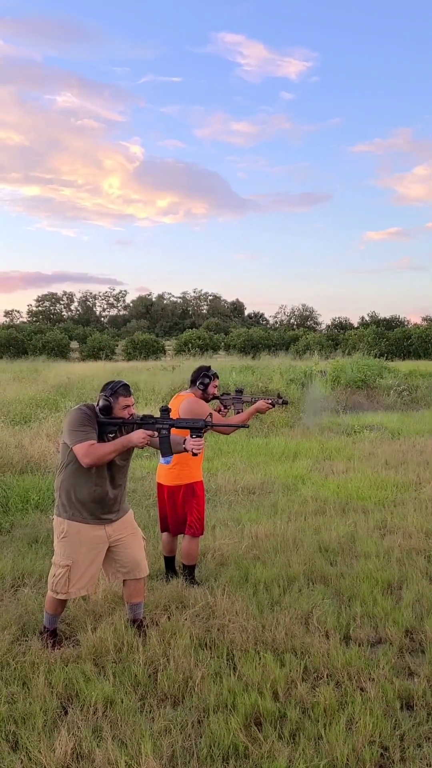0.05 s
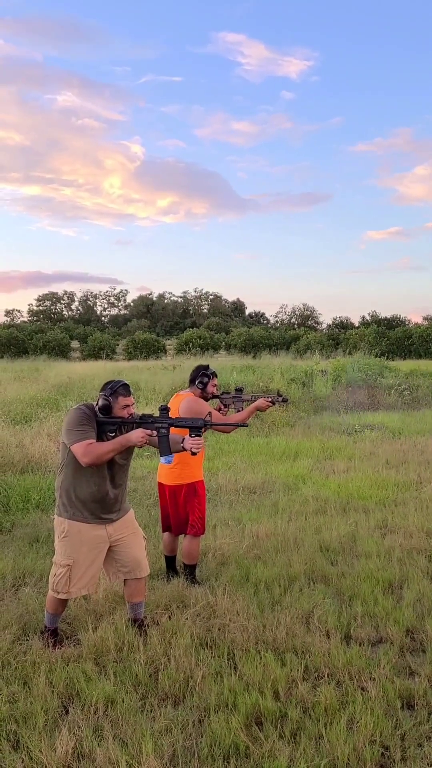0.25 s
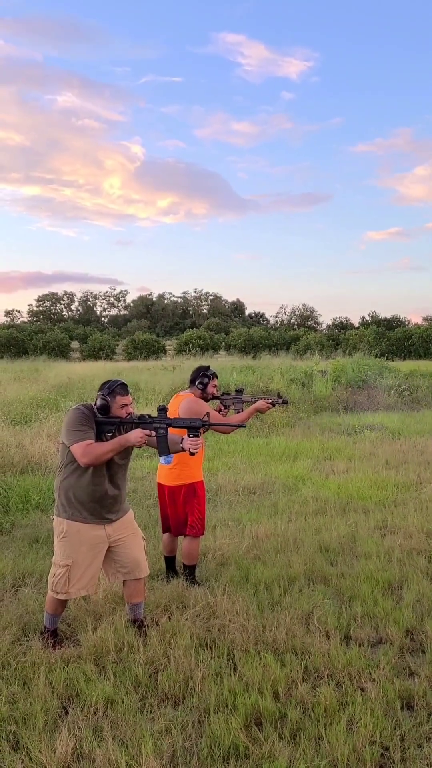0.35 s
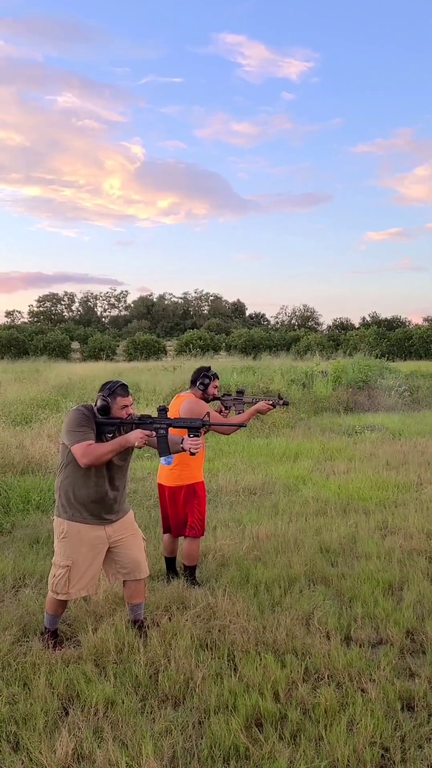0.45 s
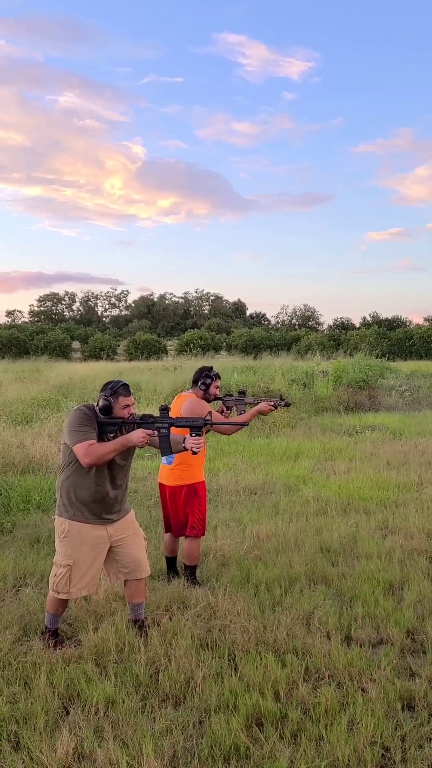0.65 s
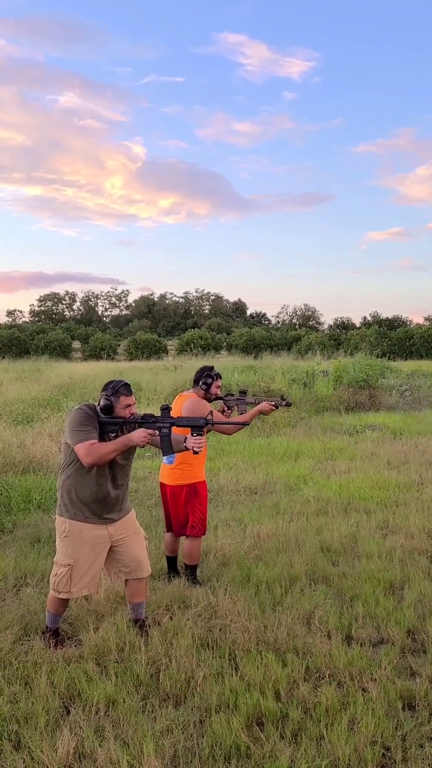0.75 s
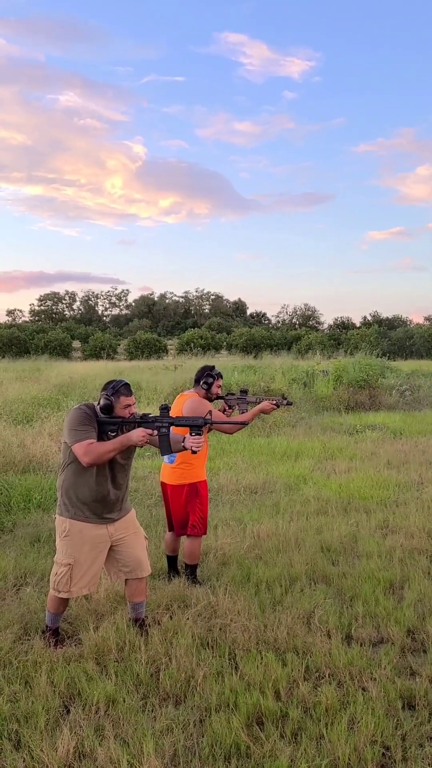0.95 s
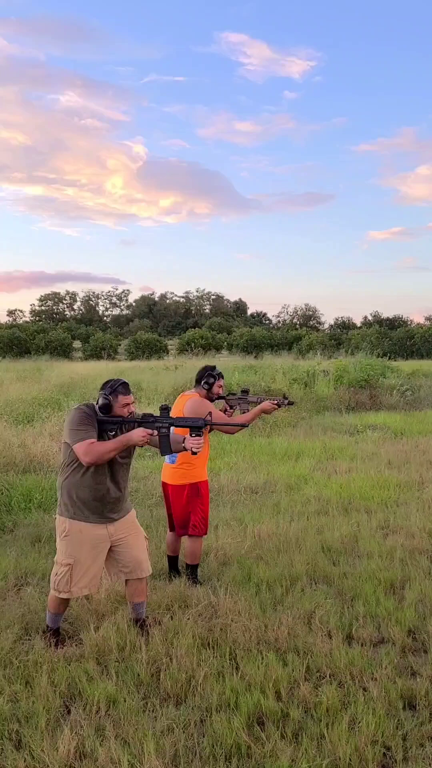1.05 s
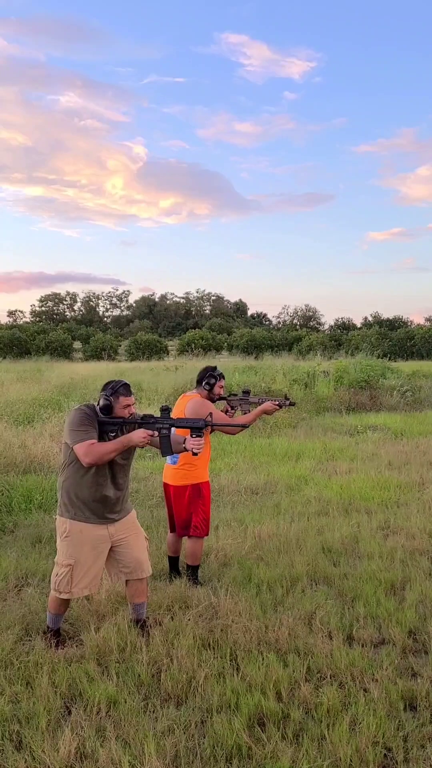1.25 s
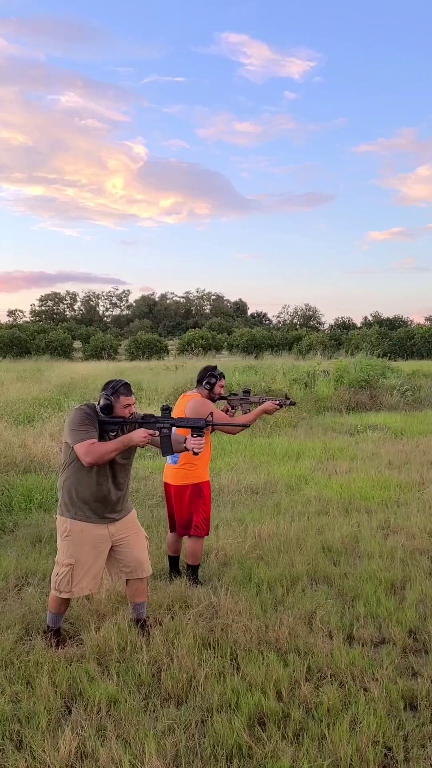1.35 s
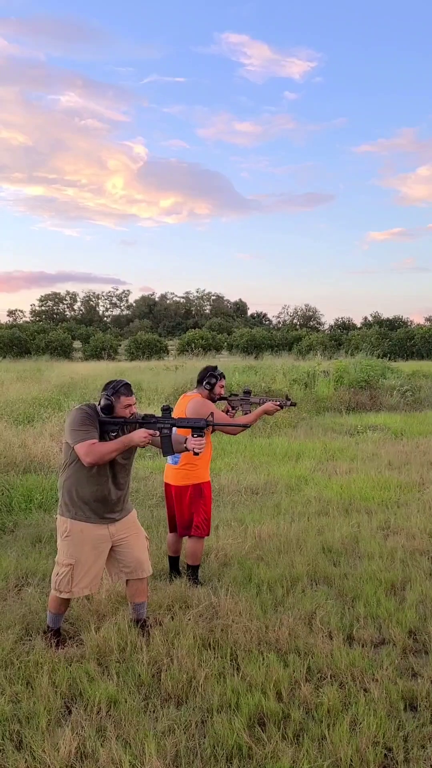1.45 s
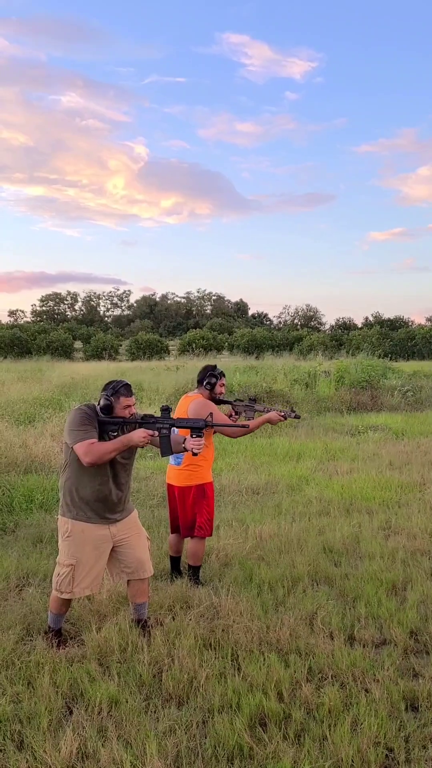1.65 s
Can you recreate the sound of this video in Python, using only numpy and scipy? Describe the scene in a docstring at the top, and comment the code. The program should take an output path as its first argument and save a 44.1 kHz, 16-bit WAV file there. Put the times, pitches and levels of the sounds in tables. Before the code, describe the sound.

Two loud shotgun blasts go off nearby at about 0.2 and 0.35 seconds, over the faint fading echo of an earlier shot. Each has a metal reloading clack and echoes across an open field. Small gun clicks come at 0.6 seconds, and light wind bumps the microphone around 0.9. A third blast hits at 1.1 seconds, followed by more clicks until 1.5 and a very faint, distant whistle near 1.7.

```python
"""In an open grassy field, an earlier shot is dying away in a light wind. After a thin tick, two shooters
a few metres off fire two quick shotgun blasts, each a pressure pulse, a boom, a thump and rushing gas.
After each, the field scatters the sound back, the self-loading gun clacks and a tree line answers.
Gun parts click, the wind swells and bumps the microphone, and a third blast goes off.
More clicks follow, and last comes a faint, far whistle."""
import sys
import numpy as np
from scipy import signal
from scipy.fft import rfft, irfft
from scipy.io import wavfile
from scipy.ndimage import uniform_filter1d

SR = 44100
rng = np.random.default_rng(int(sys.argv[2]) if len(sys.argv) > 2 else 0)


def put_to_file(sound):
    """Save the sound as 16-bit audio at rate SR, in the file named by the first command-line argument."""
    columns = np.atleast_2d(sound).T  # one column per channel
    safe = np.clip(columns, -1, 1)
    whole_steps = np.round(safe * 32767)
    wavfile.write(sys.argv[1], SR, whole_steps.astype(np.int16))


N = 74970
T, HZ = np.arange(N) / SR, np.fft.rfftfreq(N, 1 / SR)

def amp(db):
    """Turns decibels into a number to multiply by."""
    return 10 ** (np.asarray(db) / 20)

def unit(x):
    """Scales a signal to an average strength (rms) of 1."""
    return x / np.sqrt(np.mean(x ** 2) + 1e-20)

def read(points, hz):
    """Looks up a table at any pitch, sliding between its rows."""
    pitch, value = np.transpose(points)
    return np.interp(np.log(hz + 1), np.log(pitch + 1), value)

def after(s):
    """Time since s, zero before it."""
    return np.maximum(T - s, 0)

def fade(s, fade_s):
    """A level that jumps up at time s and dies away."""
    return (T >= s) * np.exp(-after(s) / fade_s)

def ring(s, hz, fade_s):
    """A tone that starts at time s and dies away."""
    return np.sin(2 * np.pi * hz * after(s)) * fade(s, fade_s)

def swell(s, width_s):
    """A smooth rise and fall around time s."""
    return np.exp(-.5 * ((T - s) / width_s) ** 2)

def flutter(span_s):
    """A random wobble that changes over span_s."""
    return unit(uniform_filter1d(rng.standard_normal(N), max(int(span_s * SR), 1)))

def panned(x, pan_db):
    """Makes the left side pan_db louder than the right."""
    return x * amp(pan_db * np.array([[.5], [-.5]]))

# Where the field's sound sits: (pitch [Hz], left minus right [dB])
FIELD_BALANCE = [(100, -1), (300, 0), (2400, -1), (6000, -1.5), (14000, -1.5)]
# How alike its two sides are: (pitch [Hz], likeness [0 to 1])
FIELD_LIKENESS = [(300, 0.92), (700, 0.84), (1400, 0.44), (3000, 0.031)]
def noise(tone, balance=FIELD_BALANCE, likeness=FIELD_LIKENESS):
    """Stereo noise of strength 1; tone says how strong its pitches are next to each other."""
    left, other = rfft(rng.standard_normal((2, N)))
    alike = np.clip(read(likeness, HZ), -1, 1)
    right = alike * left + np.sqrt(1 - alike ** 2) * other
    level_db = read(tone, HZ) + np.outer([.5, -.5], read(balance, HZ))
    return unit(irfft(np.array([left, right]) * amp(level_db), N))

def scatter(s, tone, fade_times, peak_s, rise_db):
    """Sound thrown back by plants builds for peak_s, then each pitch dies at its own speed."""
    hz, t, spectrum = signal.stft(noise(tone), SR, nperseg=256)
    spectrum *= amp(-60 * np.maximum(t - s - peak_s, 0) / read(fade_times, hz)[:, None])
    tail = signal.istft(spectrum, SR, nperseg=256)[1][:, :N]
    uneven_db = 1.22 * flutter(span_s=.0059)
    build_db = -rise_db * np.maximum(1 - after(s) / peak_s, 0) ** 2
    return tail * (T > s) * amp(uneven_db + build_db)

# What is left of an earlier shot: (pitch [Hz], level [dB])
EARLIER_TONE = [(60, -20.5), (185, -3.5), (260, -19), (428, -2), (798, -7.5), (1750, -7.5), (2360, -14.5),
                (4510, -13), (14000, -28)]
# How long far echoes last: (pitch [Hz], time to fall 60 dB [s])
FAR_FADES = [(200, 3.14), (1000, 1.26), (5000, 1.33), (12000, 0.6)]
FAR_PEAK_S, FAR_RISE_DB = .18, 26
def earlier_shot():
    """The far echo of an earlier shot is already dying away."""
    return amp(-40) * scatter(-FAR_PEAK_S, EARLIER_TONE, FAR_FADES, FAR_PEAK_S, FAR_RISE_DB)

# The hush of open air: (pitch [Hz], level [dB])
AIR_TONE = [(30, -20.5), (90, -1), (300, -13), (650, -16.5), (1400, -5.5), (2300, -17), (7500, -21),
            (9500, -61), (15000, -57)]
# Where it sits: (pitch [Hz], left minus right [dB])
AIR_BALANCE = [(1300, -1), (4400, -4.5), (8000, 4)]
def open_air():
    """A quiet, steady hush lies under everything."""
    return amp(-51) * noise(AIR_TONE, AIR_BALANCE)

# The wind's rumble: (pitch [Hz], level [dB])
WIND_TONE = [(20, -17), (50, -2.5), (90, -5), (200, -22.5), (700, -70)]
# Its rise and fall: (time [s], level [dB])
WIND_STRENGTH = [(0, -63), (.7, -67), (.75, -51.5), (1.05, -43.5), (1.25, -59.5), (1.42, -53), (1.7, -51.5)]
def wind():
    """Light wind rumbles unevenly as it brushes the microphone."""
    level_db = np.interp(T, *np.transpose(WIND_STRENGTH)) + 2.5 * flutter(span_s=.03)
    return amp(level_db) * noise(WIND_TONE, balance=[(100, 1.5)], likeness=[(100, .34)])

# The trigger's tick: (pitch [Hz], level [dB])
TRIGGER_TONE = [(5000, -20), (9000, -3), (12500, 15), (15000, -21)]
def trigger():
    """A thin tick comes just before the first blast."""
    return amp(-41.5) * fade(.166, fade_s=.0033) * noise(TRIGGER_TONE)

# The shots; each dB column turns one part up or down:
# (time [s], gas [dB], pulse [dB], boom [dB], boom pitch [Hz], boom fade [s], body [dB], thump [dB],
#  lead-in [dB], bolt [dB], field echo [dB], field echo peak after [s], brush [dB], trees [dB])
GUNSHOTS = [(0.2300, 1.5, 3, -6.5, 478, 0.0068, -16, 1.5, 9, -10, -0.5, 0.068, 0.5, -20),
            (0.3576, 2.5, -4, -5.5, 650, 0.0046, -14.5, -2.5, -33.5, -7, 0, 0.025, -8.5, 2),
            (1.0814, 2, -7, -7.5, 658, 0.004, -19, -5.5, 8, -3.5, 1, 0.044, -6.5, 3.5)]
def shotguns():
    """Each shot makes a blast, works the gun's bolt and sets off three echoes."""
    sound = np.zeros((2, N))
    for s, *blast_settings, bolt_db, field_db, peak_s, brush_db, trees_db in GUNSHOTS:
        sound += blast(s, *blast_settings) + bolt(s, bolt_db)
        sound += field_echo(s, field_db, peak_s) + brush_echo(s, brush_db) + tree_echo(s, trees_db)
    return sound

def pulse(s):
    """A sudden push of air, followed by suction."""
    age = after(s) / .00035
    return (T >= s) * (1 - age) * np.exp(-age)

# The brief hiss leading into a blast: (pitch [Hz], level [dB])
LEAD_TONE = [(100, -14), (300, -4), (680, 1), (1100, -5), (2300, -9.5), (3600, -7.5), (9000, -15.5),
             (14000, -14.5)]
# The harsh rush of gas: (pitch [Hz], level [dB])
GAS_TONE = [(60, -32.5), (150, -13), (300, -15), (620, -2.5), (1000, -0.5), (1450, -4.5), (2050, -19.5),
            (2550, -21), (3000, -8), (4200, -7), (6200, -13.5), (8200, -15.5), (9200, -22.5), (12500, -8),
            (14500, -18.5)]
# Where it sits: (pitch [Hz], left minus right [dB])
GAS_BALANCE = [(200, 17), (700, 1), (1300, 6), (2400, -2.5), (4400, -9.5), (8100, 1), (15000, -12.5)]
# How alike its two sides are: (pitch [Hz], likeness [0 to 1])
GAS_LIKENESS = [(300, 0.47), (700, 0.19), (1400, 0.0052)]
def blast(s, gas_db, pulse_db, boom_db, boom_hz, boom_fade_s, body_db, thump_db, lead_db):
    """After a brief lead-in come a pulse, a boom, a lower body tone, a thump and rushing gas."""
    paths = [(s, 1), (s + .0031, amp(-8))]  # straight here, and bounced off the ground
    lag_s = .00029 * np.array([[.5], [-.5]])  # the boom reaches the left side later
    shock = amp(pulse_db - 6) * sum(gain * pulse(at) for at, gain in paths)
    boom = amp(boom_db) * sum(gain * ring(at + lag_s, boom_hz, boom_fade_s) for at, gain in paths)
    body = amp(body_db) * sum(gain * ring(at, hz=298, fade_s=.0042) for at, gain in paths)
    thump = -amp(thump_db - 18) * ring(s - .003, hz=64, fade_s=.0096)
    gas_shape = (T >= s) * np.exp(-after(s + .0059) / .0044)  # holds briefly, then fades
    gas = amp(gas_db - 12.5) * gas_shape * noise(GAS_TONE, GAS_BALANCE, GAS_LIKENESS)
    lead_shape = (T < s) / (1 + ((T - s + .0042) / .0018) ** 2)  # peaks just before the pulse
    lead_sound = amp(-2.5) * noise(LEAD_TONE) + amp(-3.5) * np.sin(2 * np.pi * boom_hz * (T - s))
    lead_in = amp(lead_db - 22) * lead_shape * lead_sound
    return lead_in + panned(shock + body + thump, pan_db=4) + boom + gas

# The echo from the grass: (pitch [Hz], level [dB])
FIELD_TONE = [(60, -30), (282, -7.5), (500, 0), (700, -0.5), (1400, -4), (2300, -14), (3120, -6),
              (5950, -5), (9020, -10), (12200, -5), (15000, -13.5)]
# How long it lasts: (pitch [Hz], time to fall 60 dB [s])
FIELD_FADES = [(100, 0.75), (300, 0.32), (1000, 0.27), (5000, 0.5), (12000, 0.32)]
def field_echo(s, db, peak_s):
    """The nearby grass scatters the blast back as a hiss."""
    return amp(db - 22) * scatter(s, FIELD_TONE, FIELD_FADES, peak_s, rise_db=4.5)

# The bolt's two clacks: (time after the shot [s], level [dB], fade [s])
BOLT_CLACKS = [(0.0302, -17, 0.021), (0.061, -15.5, 0.0071)]
# Steel hitting steel: (pitch [Hz], level [dB])
STEEL_TONE = [(1000, -45), (3000, -14), (6500, 8.5), (9800, -9), (14000, 1)]
def bolt(s, db):
    """The bolt, the sliding part that reloads the gun, flies back and slams home."""
    clacks = sum(amp(level) * fade(s + delay, fade_s) for delay, level, fade_s in BOLT_CLACKS)
    return amp(db) * clacks * noise(STEEL_TONE)

# The echo from the bushes: (pitch [Hz], level [dB])
BRUSH_TONE = [(70, -14.5), (135, 0.5), (210, 2), (295, 7.5), (440, -7.5), (1000, -60.5)]
def brush_echo(s, db):
    """Bushes send the blast back as a low bump."""
    return amp(db - 26) * swell(s + .062, width_s=.018) * noise(BRUSH_TONE)

# The tree line's answer: (pitch [Hz], level [dB])
TREE_TONE = [(200, -44.5), (450, -8.5), (700, 7), (1000, -3.5), (1400, -7.5), (2500, -8), (8000, -15.5)]
# The long roll behind it: (pitch [Hz], level [dB])
ROLL_TONE = [(59, -51.5), (100, -15.5), (196, -6.5), (324, -14.5), (391, -11), (703, -1), (1070, -10.5),
             (1430, -3), (2130, -14), (3390, -9), (9500, -18), (12500, -17)]
def tree_echo(s, db):
    """Far trees throw the blast back, and the sound rolls on."""
    answer = amp(-39) * swell(s + .2, width_s=.02) * noise(TREE_TONE)
    wobble_db = .8 * flutter(span_s=.03)
    roll = amp(wobble_db - 38) * scatter(s, ROLL_TONE, FAR_FADES, FAR_PEAK_S, FAR_RISE_DB)
    return amp(db) * (answer + roll)

# Small clicks of the guns: (time [s], level [dB], extra ringing [dB])
GUN_CLICKS = [(0.591, -40.5, 3), (0.621, -43, 1), (1.344, -43, -6), (1.404, -44.5, 5), (1.5052, -38, 5.5),
              (1.5091, -36, 5.5), (1.512, -41, 5)]
# The notes the steel rings at: (pitch [Hz], level [dB], time to fall 60 dB [s])
STEEL_NOTES = [(3190, -14, 0.049), (4340, 0, .024), (4610, -2.5, .018), (5410, -11, .015),
               (6980, -13, 0.027), (12900, -24, .05)]
def gun_clicks():
    """Steel parts meet with a short tick and ring for a moment."""
    sound = np.zeros((2, N))
    for s, db, ring_db in GUN_CLICKS:
        tick = fade(s, fade_s=.0021) * noise(STEEL_TONE)
        notes = sum(amp(level) * ring(s, hz, fall_s / np.log(1000)) for hz, level, fall_s in STEEL_NOTES)
        sound += amp(db) * (tick + amp(ring_db) * notes)
    return panned(sound, pan_db=-8)

# Swirls of wind: (time [s], level [dB])
SWIRLS = [(.832, -40), (0.892, -39), (.953, -41), (1.042, -40)]
def wind_bumps(width_s=.0042):
    """Each swirl bumps the microphone with a quick dip in air pressure."""
    bumps = sum(amp(db) * (((T - s) / width_s) ** 2 - 1) * swell(s, width_s) for s, db in SWIRLS)
    return panned(bumps, pan_db=9)

def whistle(hz=2130):
    """One faint, far note, perhaps a bird."""
    return amp(-58.5) * swell(1.68, width_s=.036) * np.sin(2 * np.pi * hz * T)

def scene():
    """Adds the guns and the outdoor sounds together."""
    guns = shotguns() + earlier_shot() + trigger() + gun_clicks()
    return guns + wind() + open_air() + wind_bumps() + whistle()

def record(dry):
    """The recorder rounds off the loudest peaks and cuts the highest treble."""
    treble_cut = signal.firwin(401, 14850, window=("kaiser", 9), fs=SR)
    return signal.oaconvolve(np.tanh(dry), treble_cut[None], "same")

dry = scene()
out = record(dry)
put_to_file(out)
```